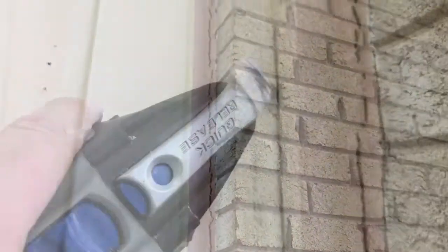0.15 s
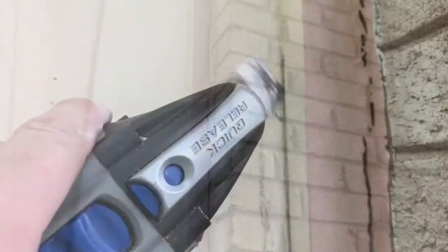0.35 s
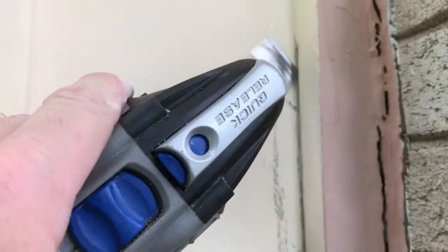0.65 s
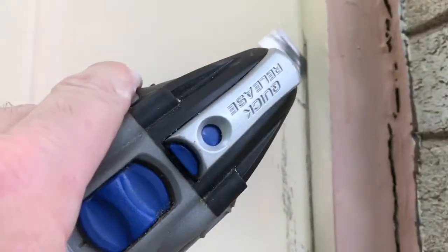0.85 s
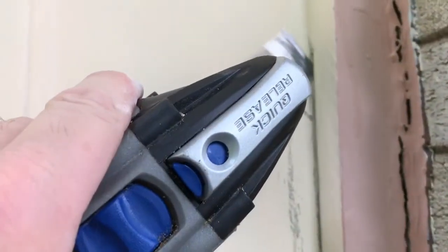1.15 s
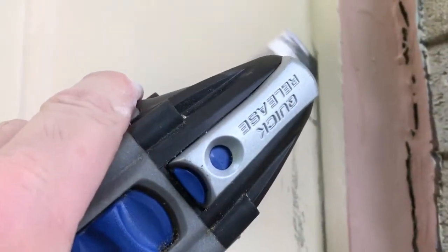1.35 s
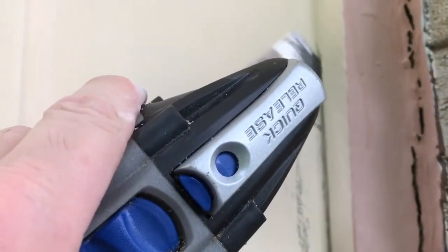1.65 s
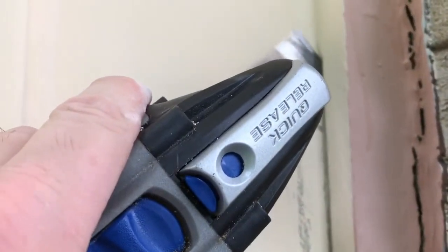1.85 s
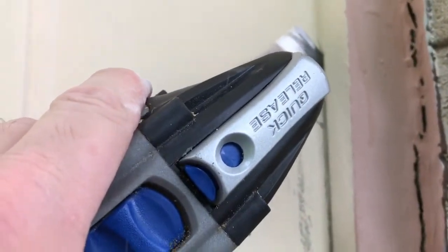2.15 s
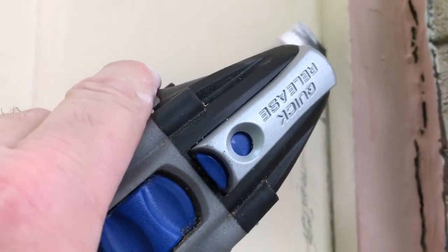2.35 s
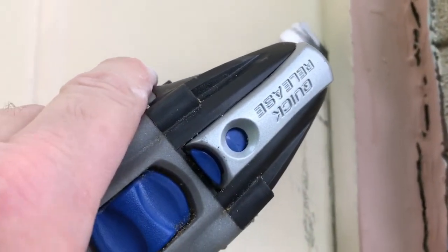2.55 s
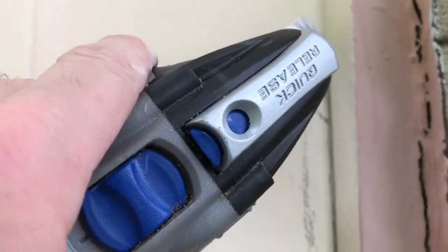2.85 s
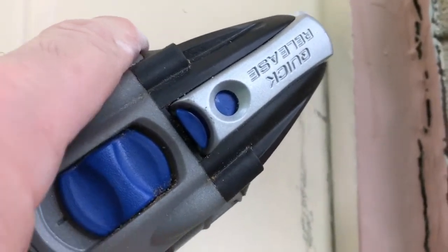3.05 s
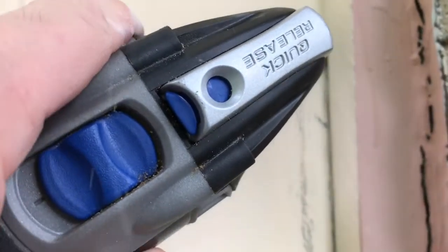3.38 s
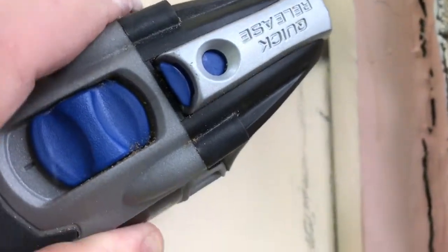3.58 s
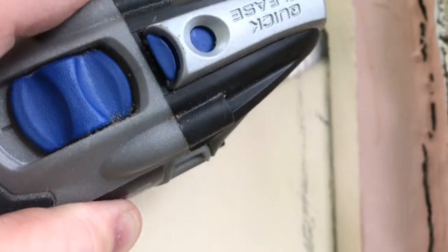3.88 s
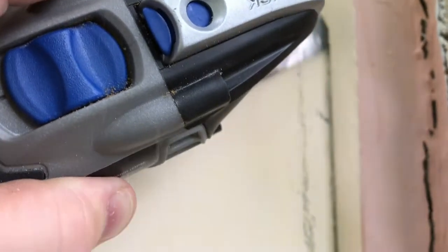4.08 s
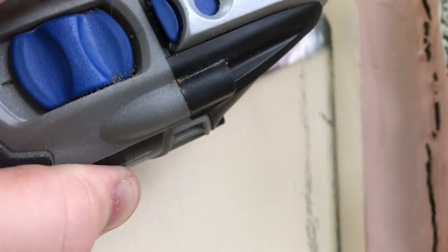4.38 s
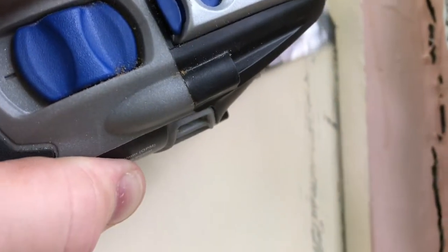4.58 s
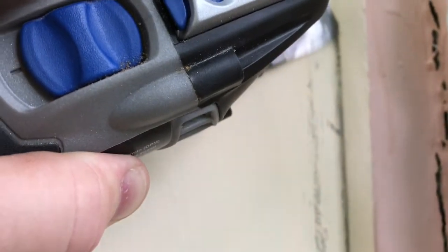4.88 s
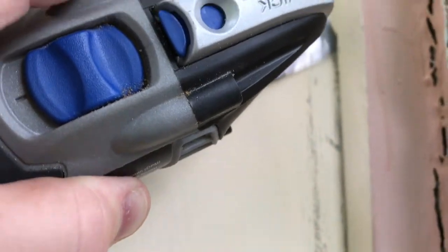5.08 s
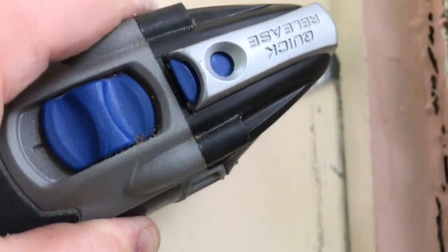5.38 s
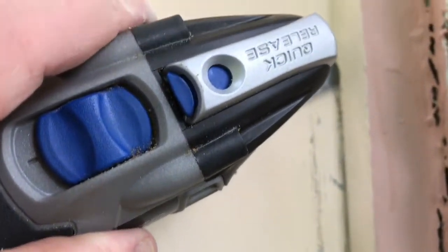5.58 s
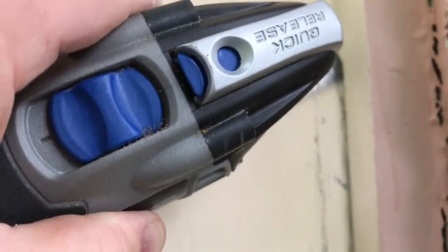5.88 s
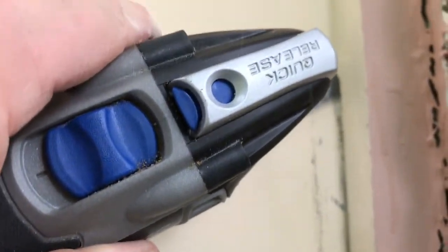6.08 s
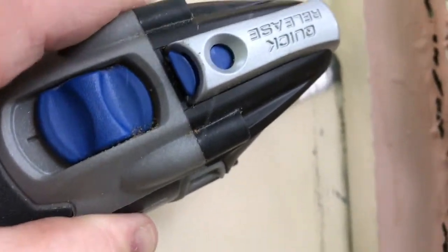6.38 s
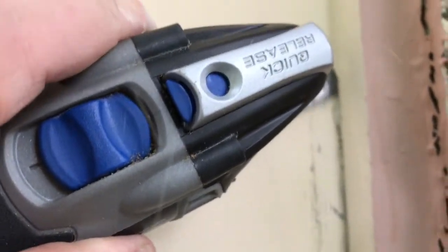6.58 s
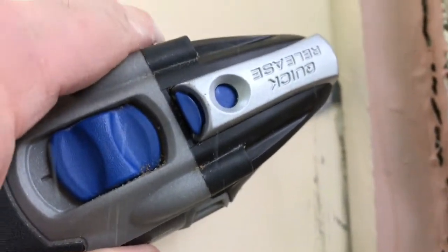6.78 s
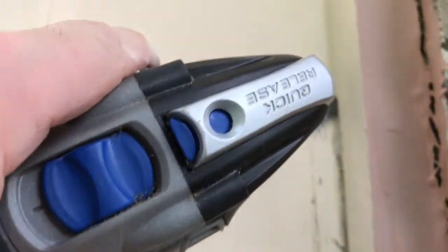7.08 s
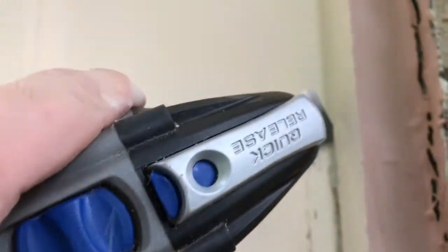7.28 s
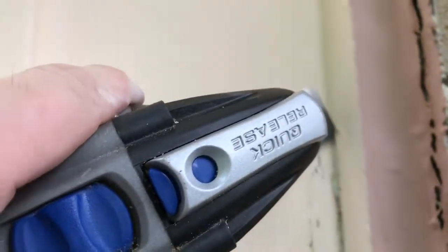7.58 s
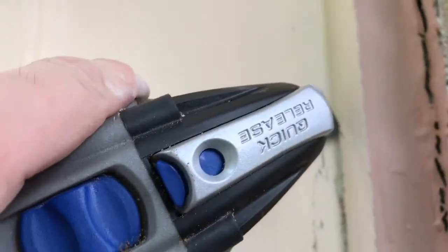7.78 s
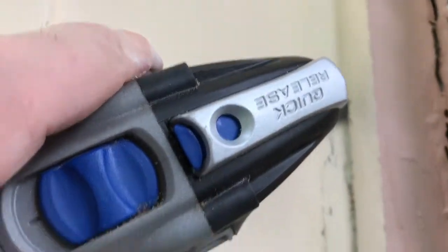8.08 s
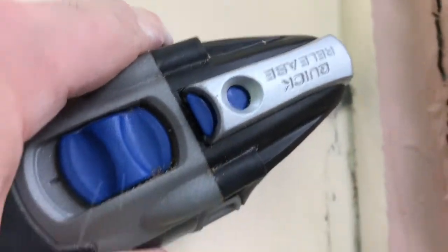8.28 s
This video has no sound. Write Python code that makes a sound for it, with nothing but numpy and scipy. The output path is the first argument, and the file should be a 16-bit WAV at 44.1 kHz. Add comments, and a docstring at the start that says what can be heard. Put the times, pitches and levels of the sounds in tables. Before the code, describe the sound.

Close, dry electric multi-tool cutting wood: a rough buzzing drone fades in, sags in pitch with ringing blade chatter, then grinds on steadily with hiss.

```python
"""Oscillating multi-tool in painted trim

An oscillating multi-tool saws into painted wooden trim beside a wall, close to a mono microphone.
The shaft swings the blade once a turn: a stack of wavering orders over the rasp and hiss of the teeth.
The free blade chatters and rings until the cut deepens, then only in brief bites.
Mains current pulses buzz in the motor housing; a faint hum, low rumble and three dull knocks lie below."""
import sys
import numpy as np
from scipy import signal
from scipy.fft import rfft, irfft
from scipy.io import wavfile
from scipy.ndimage import uniform_filter1d

SR = 44100
rng = np.random.default_rng(int(sys.argv[2]) if len(sys.argv) > 2 else 0)


def store_pcm(level_fs):
    """Save levels as 16-bit WAV."""
    pcm = np.round(np.clip(level_fs, -1, 1) * 32767).astype(np.int16)
    wavfile.write(sys.argv[1], SR, np.atleast_2d(pcm).T)


N = 372204
T = np.arange(N) / SR
SLOW_STEP = 64  # samples
SLOW_COUNT = N // SLOW_STEP + 2
SLOW_T = np.arange(SLOW_COUNT) * SLOW_STEP / SR
STAGES_S = (1.2, 1.9, 2.9, 3.5)  # touching until, shallow from, shallow until, deep from


def gain_of(db):
    """Decibels to amplitude gain."""
    return 10 ** (np.asarray(db) / 20)


def evened(x):
    """Scales to rms 1."""
    return x / np.sqrt(np.mean(x ** 2) + 1e-20)


def curves(rows, t=T):
    """Interpolates every column of a table at the times t."""
    time_s, *columns = np.transpose(rows)
    return [np.interp(t, time_s, column) for column in columns]


def by_depth(shallow, deep, t=T):
    """Glides from the shallow-cut value to the deep-cut value."""
    return np.interp(t, STAGES_S[2:], (shallow, deep))


def plateau(t, start, length, edge):
    """Ramps to 1 around start, holds, and ramps down around start + length."""
    return np.clip(np.minimum(t - start, start + length - t) / edge + .5, 0, 1)


def wander(hz, count):
    """Rows of slow chance with joint rms 1, smooth below hz, on the slow time grid."""
    f = np.fft.rfftfreq(SLOW_COUNT, SLOW_STEP / SR)
    spectrum = rfft(rng.standard_normal((count, SLOW_COUNT)))
    return evened(irfft(spectrum / (1 + (f / hz) ** 4), SLOW_COUNT))


def stepped_wander(hz):
    """One wander held over each slow step, at the full sample rate."""
    return np.repeat(wander(hz, count=1)[0], SLOW_STEP)[:N]


def ring(x, modes):
    """Passes x through fixed modes of peak gain dB, each applied twice for steep skirts."""
    out = np.zeros(N)
    for hz, width_hz, db in modes:
        mode = signal.iirpeak(hz, hz / width_hz, SR)
        once = signal.lfilter(*mode, x)
        out += gain_of(db) * signal.lfilter(*mode, once)
    return out


def spectrum_db(points, hz):
    """Interpolates a spectrum over log frequency and evens its mean power."""
    f, level = np.transpose(points)
    db = np.interp(np.log(hz + 1), np.log(f), level)[:, None]
    return db - 10 * np.log10(np.mean(gain_of(db) ** 2))


def noise(first, second, share, patchy_db):
    """Noise of rms 1 whose spectrum blends from first to second, with drifting patches."""
    hop, size = 128, 512
    frames, hz = N // hop + 5, np.fft.rfftfreq(size, 1 / SR)
    real, imag, patches = rng.standard_normal((frames, len(hz), 3)).T
    patches = uniform_filter1d(patches, 5, 0)
    patches = evened(uniform_filter1d(patches, 24, 1))
    share = np.interp(np.arange(frames) * hop, np.arange(N), share)
    colour_db = spectrum_db(first, hz) * (1 - share) + spectrum_db(second, hz) * share
    z = (real + 1j * imag) * gain_of(colour_db + patchy_db * patches)
    return evened(signal.istft(z, nperseg=size, noverlap=size - hop)[1][:N])


# shaft speed, sagging as the blade is loaded: (time [s], speed [Hz])
SHAFT_SPEED = [(0.0, 350.6), (0.89, 322.7), (1.31, 315.2), (1.72, 290.6), (1.79, 286.4), (2.07, 278.2),
               (2.42, 277.6), (2.61, 280), (2.65, 276.6), (2.94, 283.2), (2.98, 286.5), (3.15, 282.8),
               (3.24, 276.7), (3.31, 274.1), (3.74, 275.8), (4.14, 281.2), (4.37, 279.2), (4.51, 280.2),
               (4.91, 274.2), (5.71, 281.8), (6.11, 280.1), (6.28, 282.3), (6.44, 280), (6.96, 278.4),
               (7.38, 280.3), (7.71, 280.2), (7.87, 282.7), (8.18, 285), (8.32, 283.5), (8.44, 285.7)]


def shaft_turns():
    """Shaft angle in turns: integrated speed with a small tremble."""
    tremble_hz = by_depth(.4, .2) * stepped_wander(9)
    return np.cumsum(curves(SHAFT_SPEED)[0] + tremble_hz) / SR


# loudness of the cut, reference for orders and rasp: (time [s], level [dB])
CUT_LOUDNESS = [(0, -30), (.4, -22), (.8, -19), (1.25, -20), (1.7, -15.5), (2.1, -18), (3.2, -16),
                (3.8, -15.5), (4.7, -16), (5.45, -15), (6, -15), (6.4, -15.5), (6.7, -16.5), (7.5, -16),
                (8.44, -15.5)]


def cut_loudness_db(t=T):
    """Loudness the cut lends to its orders and rasp."""
    return curves(CUT_LOUDNESS, t)[0]


# swing harmonics as the blade first touches: (order, relative level [dB])
TOUCHING_ORDERS = [(1, -24), (2, -21), (3, -5.5), (4, -15), (5, -11.5), (6, -11.5), (7, -6.5), (8, -13),
                   (9, -5.5), (10, -12), (11, -9), (12, 0), (13, -7.5), (14, -2), (15, -12), (16, -7),
                   (17, -3), (18, -24), (19, -33), (20, -8.5), (21, -18), (22, -6), (23, -13), (24, -9),
                   (25, -16), (26, -10.5), (27, -27), (28, -21), (29, -14), (30, -17), (31, -14), (32, -23),
                   (33, -24), (34, -14)]
# swing harmonics in a shallow cut: (order, relative level [dB])
SHALLOW_ORDERS = [(1, -17), (2, -11), (3, -13), (4, -11.5), (5, -19), (6, -13), (7, -20), (8, -9.5),
                  (9, -3), (10, -10.5), (11, -5), (12, -12.5), (13, -8), (14, -17.5), (15, 3), (16, -12),
                  (17, -22), (18, -10), (19, 0), (20, -26), (21, -11), (22, -8.5), (23, -20), (24, -12),
                  (25, -7), (26, -8), (27, -5), (28, -12), (29, -3.5), (30, -40), (31, -18), (32, -31),
                  (33, -22), (34, -38)]
# swing harmonics in a deep cut: (order, relative level [dB])
DEEP_ORDERS = [(1, -22), (2, -7), (3, -16.5), (4, -15), (5, -11.5), (6, -10.5), (7, -10.5), (8, -5.5),
               (9, -8.5), (10, -11), (11, -10), (12, -10), (13, -7.5), (14, -6), (15, -2.5), (16, -5),
               (17, -5), (18, -11.5), (19, -7), (20, -13), (21, -8), (22, -12), (23, -10), (24, -9.5),
               (25, -11), (26, -11), (27, -10.5), (28, -8), (29, -8.5), (30, -17), (31, -38), (32, -20),
               (33, -22), (34, -23)]
# orders 1 and 2, in place of the three above: (time [s], order 1 level [dB], order 2 level [dB])
LOWEST_ORDERS = [(0, -63, -51), (.75, -47.5, -48.5), (1.03, -50, -56), (1.25, -65, -55), (1.4, -55, -48),
                 (1.55, -65, -37), (1.76, -40.5, -31.5), (1.95, -46, -30), (2.3, -40, -33),
                 (2.6, -41.5, -40), (2.77, -42, -46), (2.96, -48, -34), (3.05, -40.5, -47),
                 (3.29, -39.5, -43), (3.69, -43, -35.5), (4.18, -61, -30), (4.54, -59, -31),
                 (4.89, -52, -32), (5.71, -53, -34.5), (6.53, -50.5, -34), (6.98, -48, -38.5),
                 (8.44, -46, -36)]
# orders that swell, or now and then dip, for a while: {order: [(start [s], length [s], level change [dB])]}
SWELLING_ORDERS = {4: [(3.5, 1.64, 8), (4.05, 0.61, 3), (6.2, .2, 7.5), (7.3, 1.1, 9.5)],
                   5: [(.85, 0.27, 5), (1.3, .25, 7.5), (3.9, 4.6, 6), (6.15, 0.21, 3)],
                   6: [(1.7, 0.13, 9.5), (1.87, 0.16, 12), (4.0, 0.77, 5), (5.35, 3.1, 8)],
                   8: [(3.25, .5, 1), (5.4, 1.73, 3)], 10: [(4.9, 0.523, 6.5), (6.4, 0.714, 5)],
                   11: [(7.2, 1.177, 5)], 12: [(1.63, .1, 9.5), (1.8, 0.2, 16.5), (2.95, .2, 10.5),
                   (4.0, .3, 3), (4.65, 0.999, 4), (6.35, 0.94, 10.5)], 14: [(1.35, 0.34, 13),
                   (3.0, .15, 18), (3.9, 3.8, 6)], 15: [(3.35, 0.42, 3), (4.3, 0.28, 3), (4.8, .3, 2),
                   (5.7, 0.34, 3.5), (6.2, 0.12, 1), (7.35, .4, 5), (8.1, .4, 4.5)], 16: [(.9, 0.18, 6),
                   (3.25, 0.76, 9), (4.8, 0.79, 6), (6.1, .4, 2), (7.0, 0.38, 3), (8.1, 0.31, 1)],
                   17: [(3.15, 0.14, 10), (3.6, .4, 2), (4.4, .4, 4.5), (6.4, 0.71, 8.5), (7.3, 0.67, 4.5),
                   (.5, 0.597, 7)], 19: [(7.3, 0.493, 1), (8.05, .45, 7)], 21: [(3.4, 1.435, 2),
                   (6.7, 0.554, 3.5)], 22: [(.6, .9, 5.5)], 23: [(.8, .8, 12), (3.0, 0.59, 8), (5.4, .9, 0),
                   (7.4, 0.85, 4)], 24: [(3.2, .9, 3.5), (5.4, 0.59, -4), (7.3, .5, 1)], 25: [(.65, .3, 14),
                   (3.9, 0.55, -3), (5.4, 0.894, 4), (7.8, 0.59, 4)], 27: [(3.0, 0.528, 5), (5.4, 2.9, 5)],
                   26: [(1.2, .4, 7), (3.35, 1.25, 10), (5.35, 2.45, 12.5), (7.9, 0.43, 9)],
                   28: [(3.9, 1.49, 7.5), (6.35, 1.294, 6.5)], 29: [(3.8, 1.6, 7.5), (6.35, .85, 7),
                   (8.15, 0.13, 2)]}


def orders(turns):
    """The repeating part of each swing; every order wavers on its own as grip and contact change."""
    t, count = SLOW_T, len(DEEP_ORDERS)
    orders_db, sway_rms_db, swell_edge_s = -10.5, 1.0, .13
    loud_db = cut_loudness_db(t) + orders_db
    sway_db = sway_rms_db * wander(1.0, count)
    flutter_db = by_depth(2.6, 2.3, t) * wander(10.2, count)
    slip_rad = by_depth(.5, .2, t) * wander(17, count)
    # chance start phase, plus a lag growing with the square of the order
    start_rad = .8 * rng.standard_normal(count) + .012 * np.arange(count) ** 2
    lowest_db = curves(LOWEST_ORDERS, t)
    out = np.zeros(N)
    for i in range(count):
        order = i + 1
        steadiness = min(1, order / 8)  # scales flutter and slip: low orders hold steadier
        if i < len(lowest_db):
            db = lowest_db[i]
        else:
            touch_db, shallow_db, deep_db = TOUCHING_ORDERS[i][1], SHALLOW_ORDERS[i][1], DEEP_ORDERS[i][1]
            stage_db = np.interp(t, STAGES_S, [touch_db, shallow_db, shallow_db, deep_db])
            db = loud_db + stage_db + sway_db[i]
            for start_s, length_s, change_db in SWELLING_ORDERS.get(order, []):
                db = db + change_db * plateau(t, start_s, length_s, swell_edge_s)
        db = db + steadiness * flutter_db[i]
        phase = np.interp(T, t, start_rad[i] + steadiness * slip_rad[i]) + 2 * np.pi * order * turns
        out += np.interp(T, t, np.sqrt(2) * gain_of(db)) * np.cos(phase)
    return out


# rasp spectrum in a shallow cut: (frequency [Hz], relative density [dB per Hz])
SHALLOW_RASP = [(60, -65), (100, -38), (300, -35), (520, -19), (950, -7.5), (1700, -10.5), (2150, -3.5),
                (2800, -12), (3600, -4.5), (5000, -7), (6300, -8.5), (7800, -4.5), (8600, -7), (10000, -42)]
# rasp spectrum in a deep cut: (frequency [Hz], relative density [dB per Hz])
DEEP_RASP = [(60, -55), (100, -31), (300, -25.5), (500, -21.5), (650, -16.5), (950, -10), (1500, -12.5),
             (2150, -3), (2700, -9), (3800, -6), (5500, -7), (6800, -11), (7800, -5.5), (9500, -14),
             (11500, -25)]


def rasp(turns, deep):
    """Teeth tearing wood: noise that swells in each swing."""
    swing = 1 + .18 * np.cos(2 * np.pi * turns) + .088 * np.cos(4 * np.pi * turns)
    return gain_of(cut_loudness_db() - 6) * swing * noise(SHALLOW_RASP, DEEP_RASP, deep, patchy_db=0.0)


def tooth_puffs(turns):
    """Envelope that puffs with each swing, from one term a turn and one two a turn."""
    once = np.exp(np.cos(2 * np.pi * turns) - 1)
    twice = .5 * np.exp(2.3 * np.cos(4 * np.pi * turns) - 3.0)
    return .16 + once + twice


def tooth_blows(turns, puffs):
    """One uneven blow a swing, as a pulse of harmonics 15 to 55, plus puffs of noise."""
    strength = gain_of(1.5 * rng.standard_normal(N // 100))[np.round(turns).astype(int)]
    # teeth land one after another, blurring the treble
    lag_rad = .95 * rng.standard_normal(56) * (np.arange(56) / 35) ** 2
    # early or late by thousandths of a turn
    landing = turns + .004 * np.interp(T, SLOW_T, wander(25, count=1)[0])
    pulse = sum(np.cos(2 * np.pi * k * landing + lag_rad[k]) for k in range(15, 56))
    return evened(strength * pulse) + .3 * evened(puffs * rng.standard_normal(N))


# teeth bite and let go: (start [s], length [s], blade chatter level [dB], edge level change [dB])
BITE_EVENTS = [(0, 0.021, -30, 2), (0.057, 0.046, -30.5, 0), (.12, 0.023, -29, -1), (0.233, 0.028, -31, 0),
               (0.444, 0.021, -25, 5), (0.54, 0.053, -28, 4), (0.706, 0.066, -24, 6),
               (0.807, 0.087, -22, 6), (.91, 0.079, -26, 2), (0.968, 0.07, -27, 4), (1.08, 0.045, -23, 7),
               (1.15, 0.024, -24, 1), (1.31, 0.062, -26, 4), (1.49, 0.045, -21, 4.5),
               (1.577, 0.063, -20.5, 4.5), (1.647, .12, -21, 8.5), (1.81, 0.038, -20, 3.5),
               (1.86, 0.051, -16.5, 8), (1.914, 0.079, -18.5, 7.5), (2.03, 0.07, -23, 2.5),
               (2.123, 0.037, -27, 10), (2.21, 0.029, -22, 12), (2.282, 0.073, -27, 11),
               (2.4, 0.027, -23, 7), (2.45, 0.018, -21.5, 1), (2.491, 0.026, -21, 4),
               (2.585, 0.025, -19, 5), (2.648, 0.034, -20.5, 4), (2.695, 0.098, -26.5, 2),
               (2.825, .04, -20, 4), (2.879, 0.036, -17, 3), (2.984, 0.026, -26, 5.5),
               (3.034, 0.052, -25, 5.5), (3.141, 0.054, -21.5, 5), (3.36, .12, -25, 2),
               (3.531, 0.041, -28, 1), (3.679, .04, -32, 2), (3.77, .05, -35, 3.5), (6.102, .04, -30, 3),
               (6.275, 0.068, -35, 3), (6.877, 0.054, -35, 4), (7.118, 0.039, -37, 3.5),
               (7.3, 0.052, -26, 4), (7.688, 0.097, -28, 5), (7.9, 0.036, -35, 0), (8.08, .14, -36, 0.5),
               (8.3, 0.061, -37, -1), (8.4, 0.046, -22, -1)]


def bites():
    """Chatter gain added in each bite, and the edge level change in dB, mostly up."""
    edge_s = .014
    shapes = np.array([plateau(SLOW_T, start, length, edge_s) for start, length, _, _ in BITE_EVENTS])
    chatter_db, change_db = np.transpose(BITE_EVENTS)[2:]
    return np.interp(T, SLOW_T, gain_of(chatter_db) @ shapes), np.interp(T, SLOW_T, change_db @ shapes)


# toothed edge between bites: (time [s], level [dB])
EDGE_LEVEL = [(0, -36), (.25, -29), (.7, -27), (1.2, -29.5), (1.55, -26), (2.1, -24.5), (2.17, -33.5),
              (2.55, -31), (2.62, -26), (3.3, -26), (3.85, -23.5), (4.7, -26), (4.8, -26.5), (5.7, -26),
              (5.9, -24.5), (7.65, -26.5), (7.8, -23.5), (8.44, -23)]
# hiss spectrum in a shallow cut: (frequency [Hz], relative density [dB per Hz])
SHALLOW_HISS = [(7000, -27), (8900, -0.5), (10400, -8), (11300, -3), (12100, -2), (12800, -8), (14000, -16),
                (15600, -5)]
# hiss spectrum in a deep cut: (frequency [Hz], relative density [dB per Hz])
DEEP_HISS = [(7000, -33), (8900, -4), (10000, 1.5), (11400, -8), (12300, -7.5), (14300, -18), (15600, -6.5)]
# toothed-edge modes: (frequency [Hz], width per pass [Hz], shallow-cut gain [dB], deep-cut gain [dB])
TOOTHED_EDGE_MODES = [(8340, 450, -3, -7.5), (8930, 370, 0.5, -6), (9900, 780, -12.5, -11),
                      (11120, 1200, -9.5, -10.5), (12220, 960, -16, -7.5), (12600, 950, -12, -15),
                      (14000, 1600, -11.5, -10.5)]


def toothed_edge(deep, puffs, blows, change_db):
    """Puffs of hiss, and blows that ring the modes of the toothed edge."""
    hiss = evened(puffs * noise(SHALLOW_HISS, DEEP_HISS, deep, patchy_db=2.0))
    modes = [(hz, width_hz, a + (b - a) * deep) for hz, width_hz, a, b in TOOTHED_EDGE_MODES]
    edge = gain_of(-3) * hiss + gain_of(-5.5) * evened(ring(blows, modes))
    flicker_db = 1.1 * stepped_wander(13)
    return gain_of(curves(EDGE_LEVEL)[0] + change_db + flicker_db) * edge


# chatter of the free blade between bites: (time [s], level [dB])
FREE_CHATTER = [(0, -34.5), (.5, -27), (1.2, -30), (1.6, -25.5), (2.15, -34), (2.9, -32), (3.0, -34),
                (3.4, -45)]
# blade bending modes: (frequency [Hz], width per pass [Hz], relative gain [dB])
BLADE_MODES = [(5535, 460, 10), (5574, 53, -2)]


def blade_chatter(deep, blows, bite_gain):
    """Blows and plain noise ring the blade's bending modes; a deep cut damps all but the bites."""
    stutter_db = -1.0 * np.tanh(2 * stepped_wander(28))  # the blade catches and lets go
    level = gain_of(curves(FREE_CHATTER)[0] + stutter_db) * (1 - deep) + bite_gain
    shaking = blows + .5 * rng.standard_normal(N)
    return evened(ring(shaking, BLADE_MODES)) * uniform_filter1d(level, 100)


def teeth(turns, deep):
    """The same blows and bites drive the toothed edge and the blade."""
    puffs = tooth_puffs(turns)
    blows = tooth_blows(turns, puffs)
    bite_gain, change_db = bites()
    return toothed_edge(deep, puffs, blows, change_db) + blade_chatter(deep, blows, bite_gain)


# motor buzz, rising until 3.2 s, then slowly easing: (time [s], level [dB])
BUZZ_LEVEL = [(0, -44), (.7, -36), (1.6, -30), (2.1, -30.5), (3.2, -25), (8.44, -29)]
# housing modes: (frequency [Hz], width per pass [Hz], relative gain [dB])
HOUSING_MODES = [(2150, 307, 9), (3000, 800, -34), (3630, 900, -4.5), (905, 490, -9.5)]
# hum: (multiple of the current-pulse rate, rms level [dB])
HUM_PARTIALS = [(1, -72), (2, -69), (4, -87)]


def motor(turns):
    """Current pulses, swayed by the shaft, ring the housing; a faint hum lies below."""
    pulse_rate_hz, shaft_share, spark_share = 120.02, .033, .42
    cycle = pulse_rate_hz * T
    pulses = evened(sum(np.cos(2 * np.pi * k * cycle) for k in range(3, 40)))
    sparks = evened(np.exp(2.3 * np.cos(2 * np.pi * cycle)) * rng.standard_normal(N))
    drive = pulses * (1 + shaft_share * np.cos(2 * np.pi * turns)) + spark_share * sparks
    buzz_db = curves(BUZZ_LEVEL)[0] + 1.2 * stepped_wander(8.9)
    out = gain_of(buzz_db) * evened(ring(drive, HOUSING_MODES))
    for k, db in HUM_PARTIALS:
        out += gain_of(db) * np.sqrt(2) * np.cos(2 * np.pi * (k * cycle + rng.random()))
    return out


# low rumble under the cut: (frequency [Hz], relative density [dB per Hz])
RUMBLE_SPECTRUM = [(35, -35), (52, 11), (75, 2), (120, 0.5), (170, -20), (230, -40)]
# slow swell of the rumble: (time [s], relative level [dB])
RUMBLE_SWELLS = [(0, 3), (.7, -6), (2.5, -2), (3.2, 3), (4, 0.5), (8.44, 2)]


def low_rumble():
    """Low rumble under the cut: noise shaped in frequency, swelling slowly."""
    rumble_db = -62
    hz = np.fft.rfftfreq(N, 1 / SR)
    f, db = np.transpose(RUMBLE_SPECTRUM)
    colour = gain_of(np.interp(np.log(hz + 1), np.log(f), db, left=-60, right=-60))
    rumble = evened(irfft(rfft(rng.standard_normal(N)) * colour, N))
    return gain_of(rumble_db + curves(RUMBLE_SWELLS)[0]) * rumble


# the tool knocks the trim: (time [s], initial amplitude [dB], frequency [Hz], 60 dB decay time [s])
TRIM_KNOCKS = [(1.695, -39, 200, .04), (1.865, -42, 149.6, .04), (1.95, -28, 225, 0.019)]


def knocks():
    """Dull knocks of the tool: decaying sines."""
    out = np.zeros(N)
    for start_s, db, hz, t60_s in TRIM_KNOCKS:
        t = np.maximum(T - start_s, 0)
        out += gain_of(db - 60 * t / t60_s) * np.sin(2 * np.pi * hz * t)
    return out


def scene():
    """All cutting parts follow one shaft angle and the hand's trembling pressure; both channels are equal."""
    turns, deep = shaft_turns(), by_depth(0, 1)
    pressure = uniform_filter1d(gain_of(.63 * stepped_wander(17.0)), 128)
    cut = pressure * (orders(turns) + rasp(turns, deep) + teeth(turns, deep))
    mix = cut + motor(turns) + low_rumble() + knocks()
    return np.array([mix, mix])


def record(dry):
    """The input stage rounds off the highest peaks; then the band limit."""
    ceiling, band_limit_hz = .95, 15740
    rounded = dry / (1 + abs(dry / ceiling) ** 6) ** (1 / 6)
    taps = signal.firwin(1023, band_limit_hz, window=("kaiser", 9), fs=SR)
    return signal.oaconvolve(rounded, taps[None], "same")


dry = scene()
out = record(dry)
store_pcm(out)
```